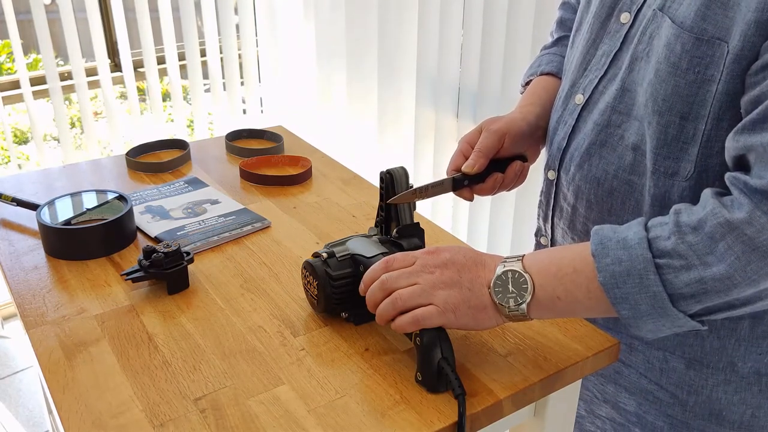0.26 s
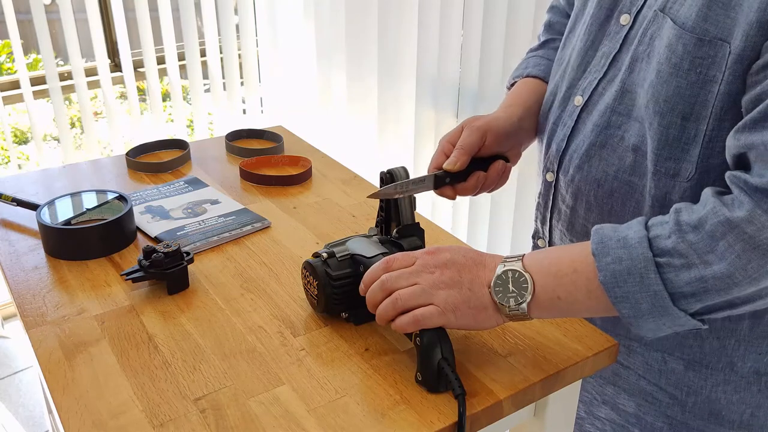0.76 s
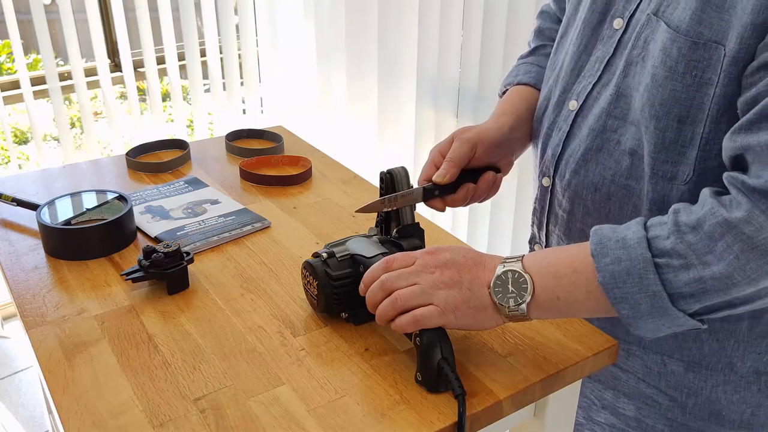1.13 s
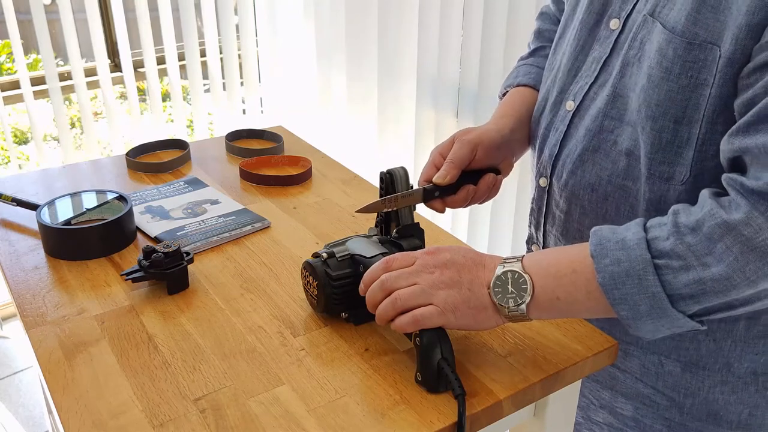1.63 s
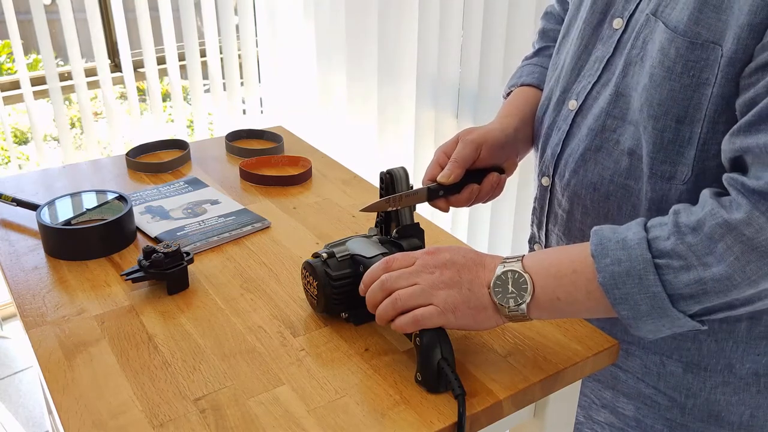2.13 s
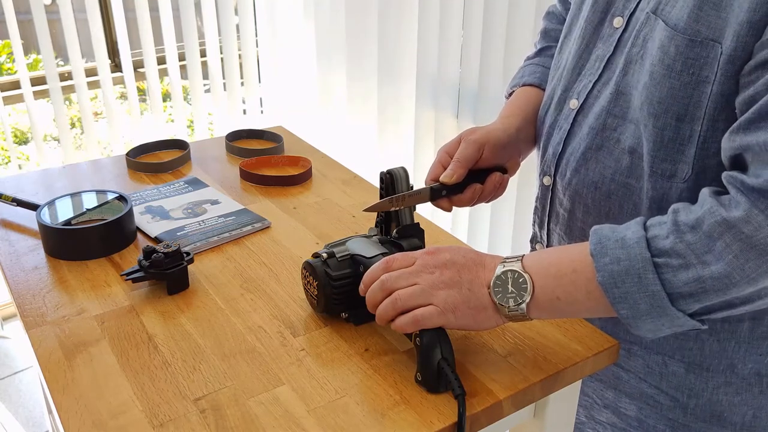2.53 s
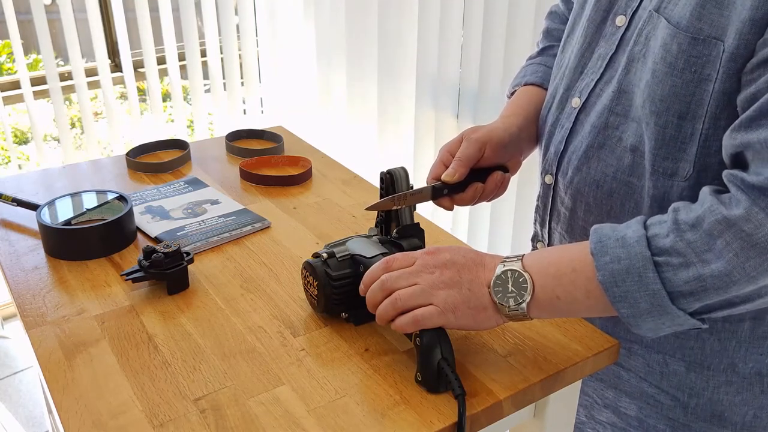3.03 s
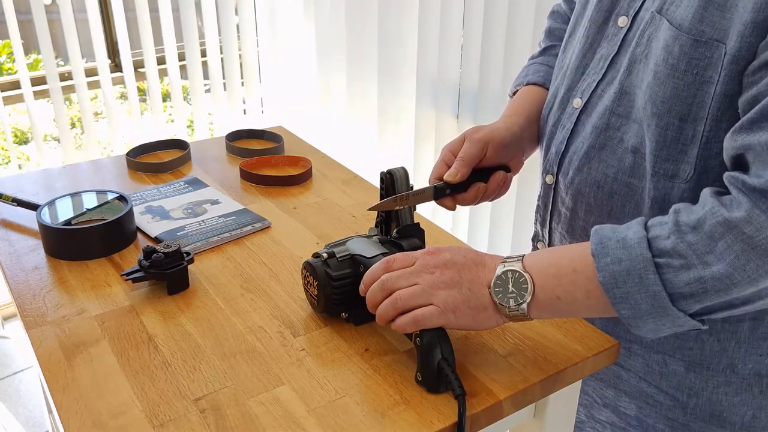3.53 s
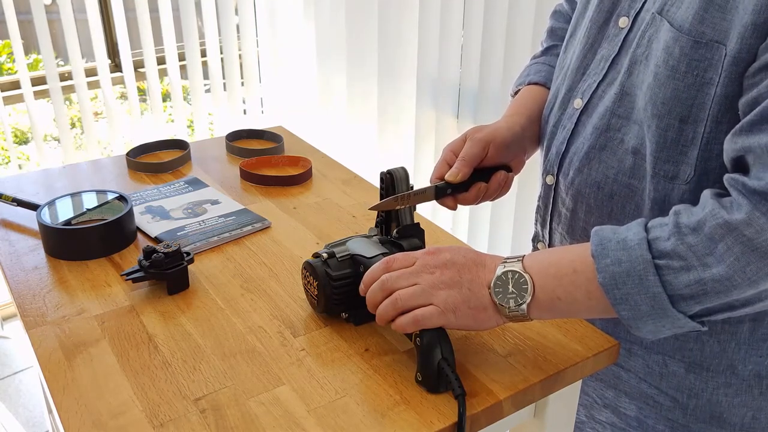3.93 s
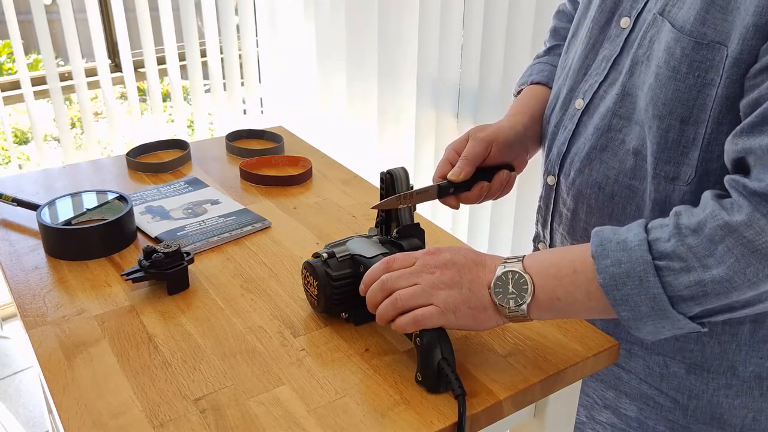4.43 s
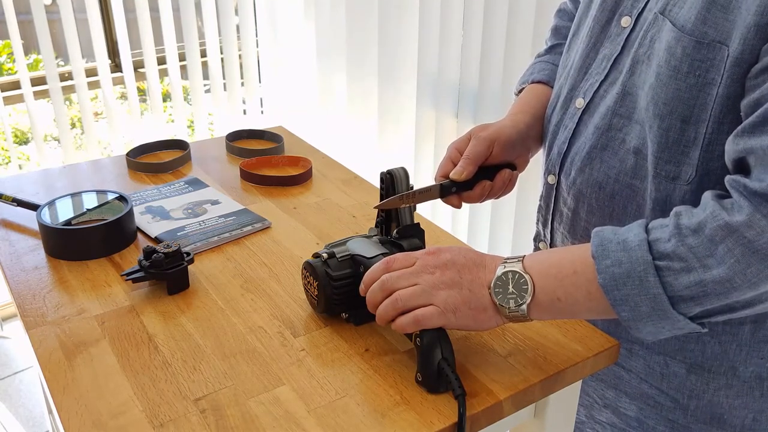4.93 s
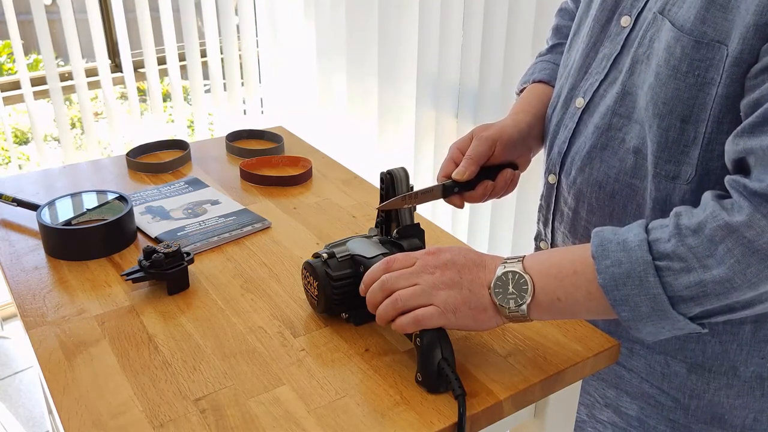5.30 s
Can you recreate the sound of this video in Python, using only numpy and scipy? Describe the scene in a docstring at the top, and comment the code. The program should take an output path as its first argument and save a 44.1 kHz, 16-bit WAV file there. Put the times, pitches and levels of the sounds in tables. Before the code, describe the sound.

A small electric belt sharpener runs with a steady motor hum and airy whirr. A knife blade grinds on the abrasive belt with a loud, bright hiss and a fast flutter. After about half a second the blade lifts, leaving only the machine. It soon touches down again for one long, even stroke with a thin metallic ring. The sound is close, at an indoor table.

```python
"""On a wooden table a small electric belt sharpener runs; a knife is lifted off once and laid on again.
Friction of the grit on the edge makes a hiss and excites the blade's modes. The belt loop passes about
25 times a second: its splice and ridges modulate the hiss and rattle the housing. Under the grinding
lie tones of the belt and motor and a whirr of cooling air. The two microphone ports resonate at
different treble pitches."""
import sys
import numpy as np
from scipy import signal
from scipy.fft import rfft, irfft
from scipy.io import wavfile
from scipy.ndimage import uniform_filter1d

SR = 44100
rng = np.random.default_rng(int(sys.argv[2]) if len(sys.argv) > 2 else 0)


def digitize_waveform(pressure):
    """Quantize a signal to 16-bit integers and store it at the path in sys.argv[1].

    Rows of a 2-D input are taken as channels; values are limited to [-1, 1].
    """
    field = np.atleast_2d(pressure).T
    bounded = np.clip(field, -1, 1)
    quanta = np.round(bounded * 32767).astype(np.int16)
    wavfile.write(sys.argv[1], SR, quanta)


N = 245195
T = np.arange(N) / SR
HZ = np.fft.rfftfreq(N, 1 / SR)

# High spots round the belt: place/laps, width/laps, power relative to plain grit
BELT_RIDGES = [(0.067, .015, .3), (0.201, .012, 0.34), (0.291, 0.0066, 4.2), (0.346, 0.017, 0.51),
               (.39, .012, 0.82), (.458, .006, 4), (.498, 0.0052, 1.8), (0.514, .006, 2), (.543, .006, 1.2),
               (.58, 0.011, 3), (.603, .014, 1.6), (0.704, .007, 0.92), (.79, .012, .5),
               (0.929, 0.023, 0.24), (.6, 0.12, 0.72)]
# The belt runs faster unloaded and sags under pressure: t/s, lead over the steady pace/laps
BELT_LEAD = [(0, -.225), (.45, -.23), (1.0, -.117), (1.42, -.041), (1.66, -.021), (2.4, -.016), (3.3, 0),
             (4.38, .01), (5.56, -.113)]
LAP_HZ = 25.32
LAPS = LAP_HZ * T + np.interp(T, *np.transpose(BELT_LEAD))


def grinding():
    """Friction noise: grit scratches the edge and excites the blade's modes, louder under pressure."""
    # Grit spectrum: f/Hz, left level/dB, right level/dB
    grit = [(2500, -71, -71), (4530, -16, -15), (6120, -5.5, -5), (6810, -4.5, -7.5), (7150, 4, -2.5),
            (8000, -5, -1), (8800, 1.5, 0.5), (9300, 2, -1), (10000, 0, -1), (10920, -4, -3.5),
            (12500, -4.5, -2), (13500, -3, -1.5), (14500, -4, -8)]
    # Blade modes: f/Hz, bandwidth/Hz, gain added over the grit
    blade_modes = [(6295, 90, .5), (7080, 60, .3), (8380, 30, 1.0), (8830, 50, .3), (9000, 70, .6),
                   (9295, 60, .6), (9860, 60, .45), (10265, 50, .5), (10560, 90, .4), (10830, 60, .3),
                   (11104, 60, .6), (11407, 60, .5), (11740, 70, .5), (12920, 70, .5), (13450, 120, .4),
                   (13750, 100, .4)]
    # The hand's draw: t/s, grinding level/dB, lower ring boost/dB, left minus right/dB
    draw = [(0, -16.5, 5, 2), (.3, -20, 1.5, -4), (.42, -18.5, 5, 3), (.52, -21.5, 2, -2),
            (1.45, -18.5, 8, 0), (1.9, -18, 8.5, -1.5), (2.7, -18, 7, -0.5), (3.3, -18, 5, -0.5),
            (4.1, -19, 4.5, -0.5), (4.3, -19, 6, 0), (4.72, -19, 5.5, -2), (5.56, -17, 3.5, -2.5)]
    grain_db = 0.2 * drift(.0003)
    grip_db = 0.54 * drift(0.026)  # the hand is unsteady
    scratch = rng.standard_normal((2, N)) * belt_surface(0.75) * gain_of(grain_db + grip_db)
    drive = mottled(scratch + 5.1 * knocks(), patchy_db=1.5)
    steel = 1 + sum(extra * peak(hz, width) ** 2 for hz, width, extra in blade_modes)
    hiss = picked_up(drive, gain_of(spectrum(grit)) * steel)
    times, *columns = np.transpose(draw)
    level_db, ring_db, pan_db = (np.interp(T, times, column) for column in columns)
    # this part of the ring changes with the blade's overhang
    lower_ring = irfft(rfft(hiss, axis=1) * peak(hz=8110, width=400) ** 2, N, axis=1)
    hiss += (gain_of(ring_db) - 1) * lower_ring
    return hiss * contact() * gain_of([level_db + pan_db / 2, level_db - pan_db / 2])


def contact():
    """Friction follows contact force: each stroke lands lightly, leans in and lifts off."""
    # Knife strokes: touch t/s, lift t/s
    strokes = [(-.5, 0.525), (1.185, 6)]
    touch_s, lift_s, settle_s, settle_db = 0.012, 0.023, 0.087, -5.5
    out = np.zeros(N)
    for touch, lift in strokes:
        since = np.maximum(T - touch, 0)
        touching = np.minimum(since / touch_s, 1) * np.clip(1 + (lift - T) / lift_s, 0, 1)
        out += touching * gain_of(settle_db * np.exp(-since / settle_s))
    return out


def knocks():
    """Impulse excitation: each sharp ridge strikes the blade once a lap."""
    out = np.zeros((2, N))
    for place, _, extra in BELT_RIDGES[:-1]:  # the last is a broad swell
        at = np.flatnonzero(np.diff(np.floor(LAPS - place)))
        out[:, at] += np.sqrt(extra) * rng.uniform(0, 1, len(at)) * rng.choice([-1, 1], (2, len(at)))
    return out


def belt_surface(height):
    """Amplitude modulation: passing ridges add noise power, biting a little differently each lap."""
    power, lap = np.ones(N), np.floor(LAPS + 1).astype(int)
    bite = gain_of(np.clip(rng.standard_normal((lap.max() + 1, len(BELT_RIDGES))), -3, 2))
    for k, (place, width, extra) in enumerate(BELT_RIDGES):
        power += height * extra * bite[lap, k] * np.exp(-((LAPS % 1 - place) / width) ** 2)
    return np.sqrt(power)


def whirr():
    """Flow and friction noise: cooling air, and the free belt sliding over its guides."""
    # Air and belt spectrum: f/Hz, left level/dB, right level/dB
    air = [(25, 2, -2), (40, -4, -4), (60.3, 2.5, 3.5), (131, -11, -4.5), (221, -4, -2.5), (450, 1.5, -2),
           (705, 4, 8.5), (1180, 5.5, 5.5), (2200, 3.5, 1), (3500, 1, 1.5), (5400, -2, -3), (6500, .5, -.5),
           (7500, 1.5, -0.5), (7950, -1, 1.5), (8650, -3.5, 4), (9420, -2.5, -2.5), (10400, -4, -4.5),
           (11000, -5.5, -3), (11900, -1.5, -2.5), (13000, -3, 0), (14500, 0, 0)]
    rush = rng.standard_normal((2, N)) * belt_surface(0.13)
    rush *= gain_of(drift(0.00018) + .5 * drift(0.041))
    return gain_of(-26) * picked_up(mottled(rush, patchy_db=1.0), gain_of(spectrum(air)))


def belt_tones():
    """Periodic forcing: harmonics of the lap rate crest together as the splice crosses the drive pulley."""
    # Harmonic numbers of the lap rate
    harmonics = [19, 20, 22, 23, 25, 26, 27, 28, 29, 30, 31, 33, 34, 35, 36, 37, 39, 42]
    # Per harmonic: early level/dB, steady level/dB, late level/dB
    levels = [(-55, -52, -49.5), (-66, -66, -67), (-60, -55, -67), (-65, -62, -51.5), (-51, -75, -77),
              (-57, -75, -77), (-46, -45, -46), (-55, -65, -52.5), (-70, -57, -68), (-58, -51, -57),
              (-45, -46, -45.5), (-46.5, -47.5, -46), (-43.5, -41.5, -45.5), (-53, -54, -56),
              (-55, -65, -54), (-50, -53, -49), (-57, -64, -61), (-56, -54, -62)]
    since_splice = LAPS - .01
    return tones(harmonics, levels, since_splice, waver_db=0.89, beat=0.24, scatter=0.35, wander=0.8)


def housing():
    """Forced resonance: the shell is shaken hardest just after the splice crosses a pulley."""
    # A narrow rumble at the idler pulley's turning rate, then modes of the plastic shell: f/Hz, bandwidth/Hz,
    # rms level/dB
    low_bands = [(65, 14, -58.5), (862, 91, -41), (911, 25, -46), (1050, 46, -48.5), (777, 80, -54),
                 (2270, 450, -45.5)]
    # Narrow high whining bands of the running machine: f/Hz, bandwidth/Hz, rms level/dB
    whine_bands = [(2733, 51, -52), (3150, 24, -54), (4187, 49, -49.5), (4600, 130, -47.5),
                   (5300, 52, -51.5), (6040, 120, -53), (6300, 200, -44.5)]
    shake = 1 + .2 * np.cos(2 * np.pi * (LAPS - .12))
    out = np.zeros((2, N))
    for hz, width, db in low_bands + whine_bands:
        out += gain_of(db) * picked_up(rng.standard_normal((2, N)) * shake, peak(hz, width) ** 2)
    return out


def motor_tones():
    """Rotational orders: motor and idler tones follow the shaft speed, which sags under load."""
    # Multiples of the shaft rate
    orders = [.626, .87, 1, 1.374, 2, 6, 12.03, 24.06]
    # Per order: early level/dB, steady level/dB, late level/dB
    levels = [(-65.5, -63.5, -62), (-65, -64, -62.5), (-52, -54, -56), (-57.5, -58.5, -58.5),
              (-61.5, -58, -58), (-51.5, -55.5, -50.5), (-46, -46, -50.5), (-61, -47, -53)]
    # Shaft rate: t/s, f/Hz
    shaft_rate = [(0, 175), (.5, 174.6), (.55, 175.4), (1.3, 175.5), (1.5, 174.5), (4.3, 174.5),
                  (4.45, 173.1), (5.56, 173.2)]
    turns = np.cumsum(np.interp(T, *np.transpose(shaft_rate))) / SR
    return tones(orders, levels, turns, waver_db=0.6, beat=0.45, scatter=1, wander=1)


def tones(orders, levels, turns, waver_db, beat, scatter, wander):
    """Superposition: wavering sines locked to a rotation, each reaching the ports from its own side."""
    # t/s at which: the early stage ends, the steady draw starts, it ends, the tip bears down (late)
    stages = [1.0, 1.6, 4.33, 4.47]
    out = np.zeros((2, N))
    for order, (early_db, steady_db, late_db) in zip(orders, levels):
        db = np.interp(T, stages, [early_db, steady_db, steady_db, late_db])
        hz = order * turns[-1] / T[-1]
        start, side, lean, swing = rng.random(4)
        phase = 2 * np.pi * (order * turns + scatter * (start - .5)) + .2 * drift(.15)
        # low tones hold steady, high ones jitter and flutter
        phase += wander * min((hz / 2200) ** 2, 1.3) * drift(.03)
        flutter = 1 + beat * min((hz / 800) ** 2, 1) * np.cos(2 * np.pi * (.35 * LAPS + swing))
        amplitude = np.sqrt(2) * gain_of(db + waver_db * drift(0.17)) * flutter
        port_phase = (side - .5) * min(hz / 900, 1.2) * np.array([[1], [-1]])
        pan = gain_of([[3 * lean - 1.5], [1.5 - 3 * lean]])
        out += amplitude * np.cos(phase + port_phase) * pan
    return out


def picked_up(drive, colour):
    """Port resonance: two partly coherent, coloured noises ring the microphone ports; mid rms 1."""
    # Likeness of left and right: f/Hz, correlation
    coherence = [(30, .75), (60, .92), (270, .93), (700, .72), (1200, .45), (2200, .35), (3200, .12),
                 (6000, .15), (7200, .78), (9300, .93), (10200, .8), (10700, .3), (12000, .3), (14000, .2)]
    # Left and right port: f/Hz, bandwidth/Hz, resonator gain/dB, gain of sound leaking past
    ports = [(11050, 720, 6, 0.036), (9065, 1080, 4.5, 0.5)]
    common, separate = rfft(drive, axis=1)
    shared = np.clip(spectrum(coherence)[0], 0, 1)
    incident = np.array([common, shared * common + np.sqrt(1 - shared ** 2) * separate])
    response = [gain_of(db) / abs(1 - (HZ / hz) ** 2 + 1j * HZ * width / hz ** 2) + leak
                for hz, width, db, leak in ports]
    pair = irfft(incident * colour * response, N, axis=1)
    return pair / np.sqrt(np.mean(pair.mean(0) ** 2))


def mottled(x, patchy_db):
    """Spectral modulation: the colour shifts in random patches of about 900 Hz by 15 ms."""
    frames = signal.stft(x, nperseg=256, noverlap=192)[2]
    patches = rng.standard_normal(frames.shape[1:])
    patches = unit_rms(uniform_filter1d(uniform_filter1d(patches, size=5, axis=0), size=10, axis=1))
    return signal.istft(frames * gain_of(patchy_db * patches), nperseg=256, noverlap=192)[1][:, :N]


def peak(hz, width):
    """Magnitude response of a resonance, 1 at its centre."""
    return 1 / np.sqrt(1 + (2 * (HZ - hz) / width) ** 2)


def spectrum(points):
    """Interpolation of a table over log frequency, one row per value column."""
    f, *columns = np.transpose(points)
    return np.array([np.interp(np.log(HZ + 1), np.log(f + 1), value) for value in columns])


def drift(seconds):
    """Random fluctuation of rms 1, smoothed over the given time."""
    span = round(seconds * SR)
    return unit_rms(uniform_filter1d(uniform_filter1d(rng.standard_normal(N), span), span))


def unit_rms(x):
    """Normalisation to rms 1."""
    return x / np.sqrt(np.mean(x ** 2) + 1e-20)


def gain_of(db):
    """Amplitude ratio of a level in decibels."""
    return 10 ** (np.asarray(db) / 20)


def scene():
    """Superposition of blade and machine; the motor body is nearer the right port, so the left lags."""
    blade = grinding()
    left, right = housing() + belt_tones() + motor_tones()
    body = np.array([np.roll(left, shift=3), right])
    return blade + body + whirr()


def record(dry):
    """Soft saturation in the input stage rounds the tallest peaks; a low-pass limits the band."""
    ceiling, edge_hz = .85, 14150
    rounded = dry / (1 + abs(dry / ceiling) ** 4) ** (1 / 4)
    low_pass = signal.firwin(511, edge_hz, window=("kaiser", 9), fs=SR)
    return signal.oaconvolve(rounded, low_pass[None], "same")


dry = scene()
out = record(dry)
digitize_waveform(out)
```